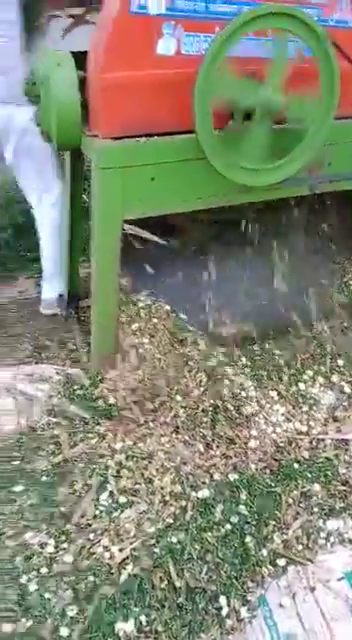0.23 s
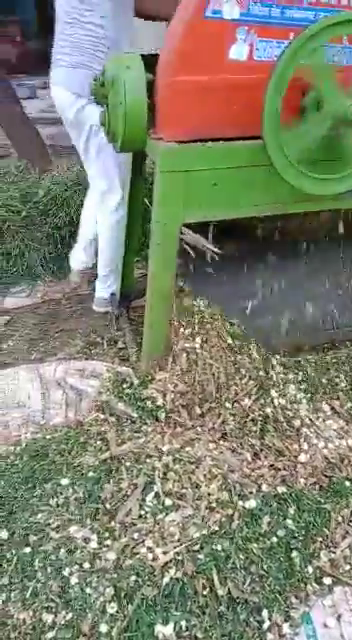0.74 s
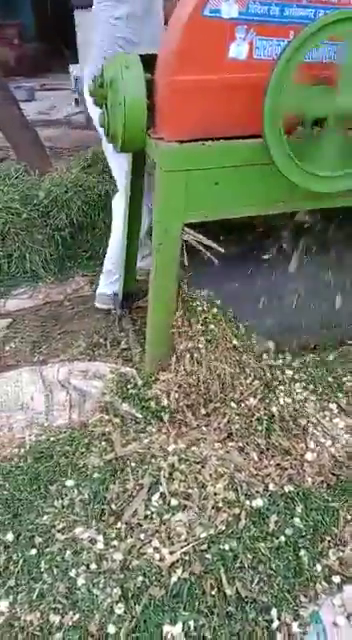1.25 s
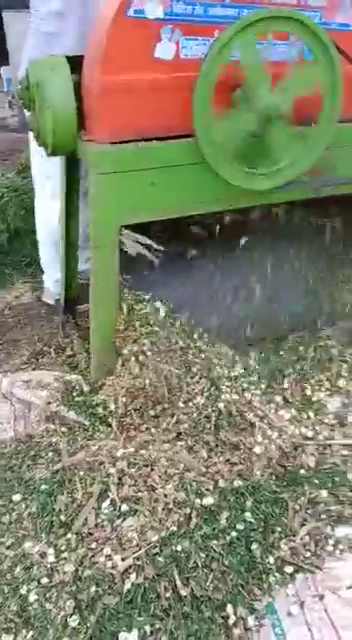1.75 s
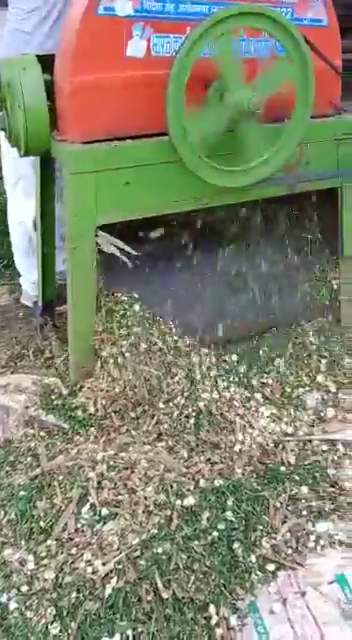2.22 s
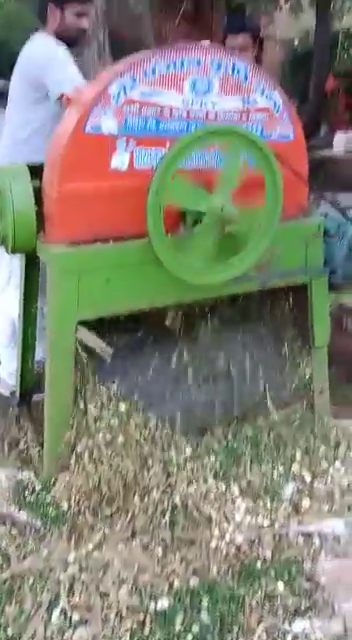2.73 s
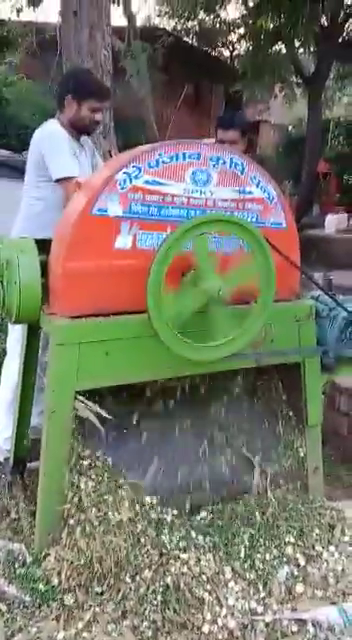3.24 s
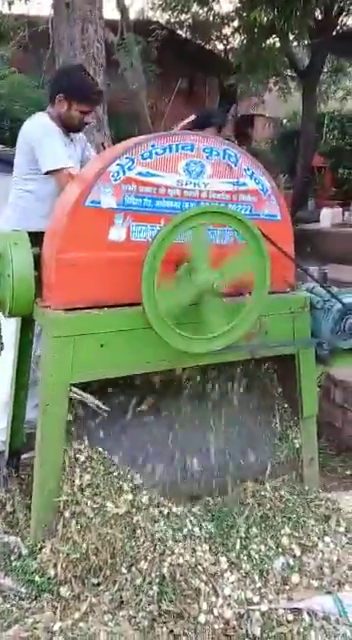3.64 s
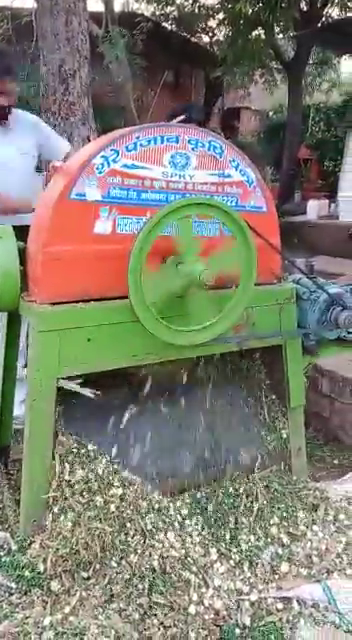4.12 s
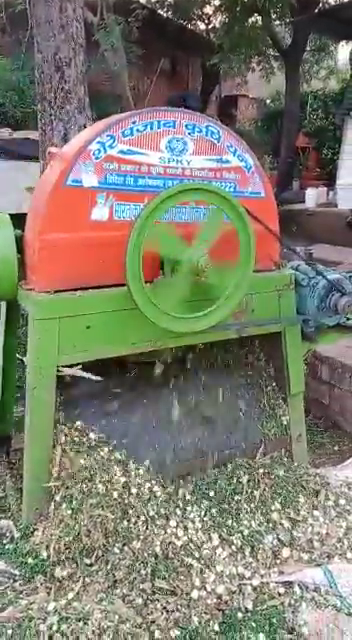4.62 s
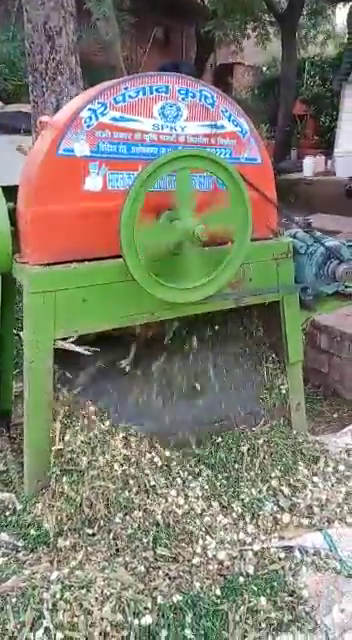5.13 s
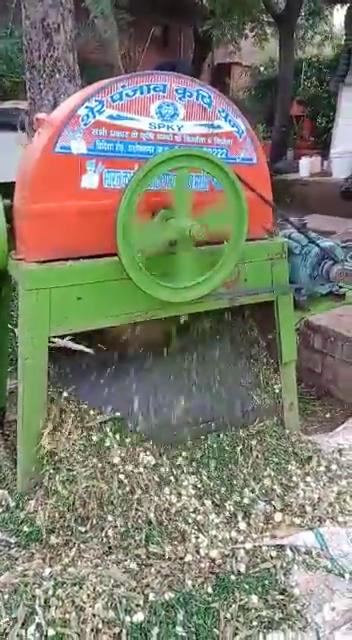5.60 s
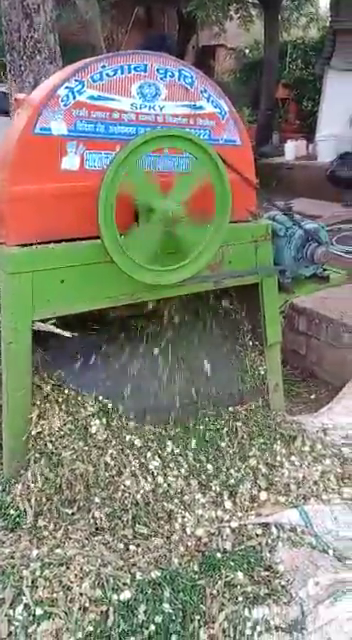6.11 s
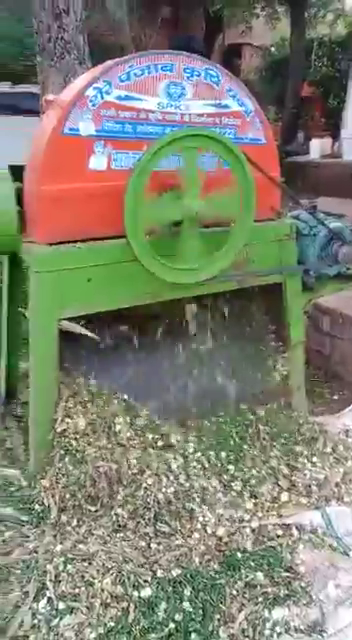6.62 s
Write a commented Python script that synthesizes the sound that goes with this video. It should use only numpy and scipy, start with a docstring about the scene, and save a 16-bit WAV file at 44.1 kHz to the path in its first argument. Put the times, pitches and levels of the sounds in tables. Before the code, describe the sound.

An electric chaff cutter runs steadily for about seven seconds, outdoors and a step from the microphone. Its knives cut green stalks evenly, about seven times a second, each cut a crisp snap with a woody crunch, followed by chopped pieces pattering on the steel hood and the heap. Underneath, a feed gear clanks in a fast rattle that makes the panels ring, and the frame gives a low drone and hum. Thicker stalks crack at about 1.2, 1.9, 3.6 to 4 and 6.5 seconds. Hard pieces ping briefly on the steel three times around 2 seconds, then near 3.8, faintly at 4.8, and at 6.4. Dull thumps jolt the frame near 0.9 and 1.3 seconds, and more lightly later. Between 2.4 and 3.1 seconds the microphone moves from the side to the front, and the treble opens slightly. The chopping continues to the end.

```python
"""Quick, even crunching of green stalks: an electric chaff cutter, outdoors, a step from the microphone.
Two knives on its flywheel each cut once a turn; the chopped pieces patter on the steel hood and fall.
Under the cuts an eleven-tooth feed gear clanks and rattles the panels, and the hood and frame drone
with the drive. Partway through, the microphone moves round to the front and the top treble opens a little."""
import sys
import numpy as np
from scipy import signal
from scipy.fft import rfft, irfft, next_fast_len
from scipy.io import wavfile
from scipy.ndimage import map_coordinates

SR = 44100
rng = np.random.default_rng(int(sys.argv[2]) if len(sys.argv) > 2 else 0)


def unload_wav(signal):
    """Save mono or channel-first audio to the path in sys.argv[1] as 16-bit WAV at rate SR, clipped to [-1, 1]."""
    wavfile.write(
        sys.argv[1],
        SR,
        np.round(np.clip(np.atleast_2d(signal).T, -1, 1) * 32767).astype(np.int16),
    )


N = 302526

# Speed of the flywheel. Each row: time in seconds, turns a second.
FLYWHEEL_SPEED = [(0, 3.706), (3.3, 3.705), (3.8, 3.718), (4.8, 3.719), (5.3, 3.707), (6.9, 3.717)]
# Load on the drive. Each row: time in seconds, dB over the usual load.
DRIVE_LOAD = [(0.0, -0.0), (0.9, -0.1), (1.55, -2.5), (2.0, -0.3), (2.45, -1.5), (2.85, 1.1), (3.2, -0.9),
              (3.7, 1.6), (4.4, 1.7), (4.95, 0.95), (5.45, -0.25), (6.85, 0.3)]
# Two knives, one biting harder. Each row: place on the wheel in turns, snap offset in dB, crunch in dB.
FLYWHEEL_KNIVES = [(0.367, -1.5, -18), (0.878, 0.5, -16.5)]
# Fodder in the chute. Each row: time in seconds, crisp snap and flying chaff in relative dB.
CHUTE_FODDER = [(0.1, -19, -23.5), (0.55, -14.5, -28), (1.1, -15.9, -23), (1.4, -18.1, -27.5),
                (1.9, -17.0, -24.7), (2.7, -17.5, -27.3), (3.15, -21, -27.2), (3.75, -18.5, -25),
                (4.7, -18.5, -25), (5.2, -18.5, -25.5), (6.4, -18, -28), (6.8, -16.5, -23.5)]
# The bundle thickens and takes longer to cut. Each row: time in seconds, length of the bite in seconds.
BITE_LENGTH = [(1.0, 0.021), (1.3, 0.028)]
# Thick woody stalks cracking. Each row: time of the peak in seconds, level in dB.
THICK_STALKS = [(0.197, -20), (0.53, -22), (1.18, -16.5), (1.857, -17), (3.609, -16), (3.786, -15),
                (4.013, -19), (5.495, -19.5), (6.471, -14.5)]
# Hard pieces hitting the steel. Each row: start in seconds, level in dB, pitch in Hz.
STEEL_KNOCKS = [(1.828, -12, 3100), (1.984, -10.5, 2860), (2.121, -10, 3086), (3.78, -13, 2850),
                (4.819, -18, 3070), (6.432, -10, 2900)]
# Thick bundles jolting the frame as they feed in. Each row: time of the peak in seconds, level in dB.
FEED_THUMPS = [(0.864, -20), (1.277, -22), (2.457, -27), (2.757, -30), (2.94, -28), (3.755, -24),
               (3.964, -26), (4.55, -25), (4.654, -28), (5.078, -25), (5.76, -27), (6.09, -25), (6.73, -24)]
# Steel panels. Each row: pitch in Hz, width in Hz, relative dB from the side, then from the front.
PANEL_MODES = [(588.5, 70, -13, -14.5), (748, 71, -5, -27), (938, 68, -16, -11), (1129, 61, -18, -9.5),
               (1198, 25, -12.5, -14), (1243, 47, -11, -16), (1313, 53, -12.5, -8.5), (1362, 39, -17, -16),
               (1720, 84, -9.5, -13)]
# Hum of the drive. Each row: multiple of the tooth rate, relative level in dB.
HUM_PARTIALS = [(4, -3), (6, -7), (7, -0.5), (8, -13.5), (10, -4.5)]
# The walk round the machine. Each row: time in seconds, place from 0 (side) to 1 (front).
MIC_PATH = [(2.4, 0.3), (3.1, 1)]
# Tone colours at close range. Each row: frequency in Hz, relative spectral density in dB.
SNAP_COLOUR = [(100, -39), (1500, -13), (3000, -3.5), (4200, -5), (5100, 3.5), (6000, -2), (7500, -9),
               (9000, -17.5), (12000, -18), (15500, -16)]  # crisp skins snapping
CRUNCH_COLOUR = [(50, -37), (150, -6), (300, -0.5), (600, -2.5), (1000, -0.5), (1600, 5), (1950, -8.5),
                 (2400, -2.5), (2900, 2.5), (3500, -2.5), (4200, -35.5), (8000, -22.5), (16000, -46)]  # woody cores breaking
CHAFF_COLOUR = [(700, -16), (1900, -5.5), (2400, -2.5), (2900, 3.5), (3500, 1), (4200, -9), (5200, -2.5),
                (6500, -12), (7600, -16.5), (9500, -40), (15500, -26)]  # chopped pieces landing
GEAR_COLOUR = [(80, -64), (500, -29.5), (820, -29), (925, -9), (1050, -33.5), (1150, 10.5), (1260, 1.5),
               (1355, -2), (1410, -35.5), (1540, -19), (1900, -23.5), (3000, -5), (4500, -14.5),
               (16000, -46)]  # the cast gear and its guard ringing
SCRAPE_COLOUR = [(80, -48), (600, -23.5), (930, -13.5), (1100, -1.5), (1450, -3.5), (1530, -1.5),
                 (1590, -10.5), (1660, 4), (1735, -4), (1800, -14), (2100, -16), (5000, -51.5),
                 (16000, -75)]  # teeth sliding out of mesh
BOOM_COLOUR = [(25, -41), (45, -30), (72, -20.5), (92, -9), (112, -12.5), (140, -0.5), (168, -0.5),
               (197, -3), (280, 3.5), (425, -6.5), (490, -8), (800, -13.5), (2200, -25), (16000, -57.5)]  # hood and frame booming
THUD_COLOUR = [(30, -37), (65, -13.5), (90, 0.5), (115, 1), (160, -1), (260, -9.5), (400, -9), (900, -42),
               (16000, -92)]  # the jolted frame

GEAR_TEETH = 11
GEAR_DB, FRAME_DB = -20.5, -19  # base gains at the usual load
GEAR_PER_LOAD, FRAME_PER_LOAD, CRUNCH_PER_LOAD = 1.33, 0.81, 1.17  # dB for each dB of load


def cut_schedule():
    """Each knife breaks through once a turn. Gives seconds, then snap, crunch and chaff in dB."""
    turns = np.cumsum(curves(FLYWHEEL_SPEED)[0]) / SR
    passes = [(turn + place, snap, crunch)
              for turn in range(int(turns[-1]) + 1) for place, snap, crunch in FLYWHEEL_KNIVES]
    angle, knife_snap, knife_crunch = np.transpose([p for p in passes if p[0] < turns[-1]])
    times = np.interp(angle, turns, np.arange(N) / SR)
    snap_db, chaff_db = at(CHUTE_FODDER, times)
    crunch_db = knife_crunch + CRUNCH_PER_LOAD * at(DRIVE_LOAD, times)[0]
    cuts = np.column_stack([times, snap_db + knife_snap, crunch_db, chaff_db])
    scatter = [0.0022, 0.34, 1.63, 1.74]  # no two cuts are alike: seconds, dB, dB, dB
    return (cuts + scatter * rng.standard_normal(cuts.shape)).T


def knives(cuts):
    """Each cut is a burst of breaking fibres: crisp skins, woody cores, now and then a thick stalk."""
    peaks, snap_db, crunch_db, _ = cuts
    bite_s, = at(BITE_LENGTH, peaks)
    snap = strokes(peaks, snap_db - 0.5, bite_s, fall_s=0.014, linger_s=0.04, linger_db=6)
    skins = snap * crackle(rate=12000, spread_db=1.5, clump_db=1.45)
    usual = strokes(peaks, crunch_db - 1.5, bite_s, fall_s=0.031, linger_s=0.048, linger_db=2)
    thick = strokes(*np.transpose(THICK_STALKS), rise_s=0.016, fall_s=0.024, linger_s=0.04, linger_db=1.5)
    cores = np.hypot(usual, thick) * crackle(rate=5000, spread_db=3.0, clump_db=1.5)
    return ring(skins, SNAP_COLOUR) + ring(cores, CRUNCH_COLOUR)


def chaff(cuts):
    """Chopped pieces patter on the hood and the heap, louder after a cut that throws more."""
    peaks, _, _, chaff_db = cuts
    flight_s = 0.028
    level_db = np.interp(np.arange(N) / SR, peaks + flight_s, chaff_db)
    flutter_db = 1.3 * wobble(45)
    patter = crackle(rate=3700, spread_db=1.5, clump_db=1.5)
    return amp(level_db - 3.0 + flutter_db) * ring(patter, CHAFF_COLOUR)


def knocks():
    """Hard pieces of stalk strike the steel: a short, rough ring each."""
    out, t = np.zeros(N + SR), np.arange(SR // 10) / SR
    attack = 1 - np.exp(-t / 0.00049)
    decay_db = -60 * t / 0.065
    for start, db, hz in STEEL_KNOCKS:
        phase = 2 * np.pi * hz * t + .7 * wobble(500)[:len(t)]
        out[round(start * SR):][:len(t)] += amp(db + decay_db) * attack * np.sin(phase)
    return out[:N]


def gear():
    """Every tooth lands with a clank, chatters as it takes the load, then scrapes out of mesh."""
    teeth = tooth_count()
    tooth, phase = teeth.astype(int), teeth % 1
    scatter_db = .7 * rng.standard_normal(tooth[-1] + 1)[tooth]
    force = amp(GEAR_DB + GEAR_PER_LOAD * curves(DRIVE_LOAD)[0] + scatter_db)
    landings = np.diff(np.floor(teeth + .01 * wobble(20)), prepend=0) > 0
    t = np.arange(SR // 20) / SR
    casting_ring = np.exp(-((t - .007) / 0.0038) ** 2) * np.sin(2 * np.pi * 1288 * t)
    clank = amp(-5.3) * unit(signal.fftconvolve(landings * 1., casting_ring)[:N])
    contact = np.exp(-((phase - .22) / 0.24) ** 2)
    chatter = unit(contact * rng.standard_normal(N))
    sliding = amp(2.1 * np.cos(2 * np.pi * (phase - .42)))
    scrape = amp(-6.5) * ring(unit(sliding * rng.standard_normal(N)), SCRAPE_COLOUR)
    return force * (clank + amp(-10) * ring(chatter, GEAR_COLOUR) + scrape + amp(-3) * panels(chatter))


def tooth_count():
    """How many gear teeth have met by each sample, starting halfway through a tooth."""
    return .5 + GEAR_TEETH * np.cumsum(curves(FLYWHEEL_SPEED)[0]) / SR


def panels(shaking):
    """Steel panels sing on between the teeth; their balance depends on where the microphone stands."""
    front, = curves(MIC_PATH)
    out = np.zeros(N)
    for hz, width, side_db, front_db in PANEL_MODES:
        resonance = signal.iirpeak(hz, hz / width, SR)
        mode = signal.lfilter(*resonance, signal.lfilter(*resonance, shaking))
        out += amp(side_db + front * (front_db - side_db)) * unit(mode)
    return out


def frame(cuts):
    """Hood and frame boom and hum with the drive; each cut jolts them lightly, thick bundles harder."""
    teeth = tooth_count()
    boom = amp(0.81 * wobble(10)) * ring(ticks(rate=2500, spread_db=2.5), BOOM_COLOUR)
    hum = np.zeros(N)
    for multiple, db in HUM_PARTIALS:
        level = amp(db + 4.5 * wobble(7))
        hum += level * np.sin(2 * np.pi * multiple * teeth + 1.06 * wobble(9))
    drive = amp(FRAME_DB + FRAME_PER_LOAD * curves(DRIVE_LOAD)[0])
    drone = drive * (amp(-1.89) * boom + amp(-11.5) * unit(hum))
    cut_jolts = [(peak, -35 + 4.5 * rng.standard_normal()) for peak in cuts[0]]
    peaks, jolt_db = np.transpose(list(FEED_THUMPS) + cut_jolts)
    jolts = strokes(peaks, jolt_db, rise_s=0.024, fall_s=0.037, linger_s=.05, linger_db=-14)
    return drone + ring(jolts * ticks(rate=3300, spread_db=0), THUD_COLOUR)


def hood_shade(x, corner_hz=8600, side_db=-2.5, front_db=0.5):
    """From the side the hood shades the top treble; it opens as the microphone comes to the front."""
    front, = curves(MIC_PATH)
    treble = signal.sosfiltfilt(signal.butter(2, corner_hz, 'highpass', fs=SR, output='sos'), x)
    return x + (amp(side_db + front * (front_db - side_db)) - 1) * treble


def strokes(peaks, level_db, rise_s, fall_s, linger_s, linger_db):
    """Envelope of blows that set in sharply, build to their peak, drop quickly and linger a little."""
    touch_share, touch_s = .25, .003  # the part of a blow that arrives almost at once
    power, t = np.zeros(N), np.arange(N) / SR
    for peak, db, build in np.broadcast(peaks, level_db, rise_s):
        start = peak - build
        near = slice(int((start - .02) * SR), int((start + .3) * SR))
        touch = np.clip((t[near] - start) / touch_s + 1, 0, 1)
        press = np.clip((t[near] - start) / (0.87 * build), 0, 1)
        attack = touch_share * touch + (1 - touch_share) * press
        after = np.maximum(t[near] - peak, 0)
        decay = np.exp(-(after / fall_s) ** 2) + amp(linger_db) * np.exp(-after / linger_s)
        power[near] += (amp(db) * attack * decay / (1 + amp(linger_db))) ** 2
    return np.sqrt(power)


def crackle(rate, spread_db, clump_db):
    """Tiny impacts that swell in clumps: fibre by fibre, and more slowly stalk by stalk."""
    return unit(ticks(rate, spread_db) * amp(clump_db * (0.76 * wobble(300) + 0.93 * wobble(70))))


def ticks(rate, spread_db):
    """Random tiny impacts, rate a second, with scattered sizes, at rms 1."""
    hits = rng.random(N) < rate / SR
    sizes = amp(spread_db * np.clip(rng.standard_normal(N), -2, 2))
    return unit(hits * rng.choice([-1, 1], N) * sizes)


def ring(x, colour):
    """x through a resonant body of the given colour and unit power gain."""
    size = 8192
    hz, db = np.transpose(colour)
    gain = amp(np.interp(np.log(np.fft.rfftfreq(size, 1 / SR) + 1), np.log(hz), db))
    # minimum phase: the body rings only after it is struck
    cepstrum = irfft(np.log(gain))
    cepstrum[1:size // 2] *= 2
    cepstrum[size // 2 + 1:] = 0
    response = irfft(np.exp(rfft(cepstrum)))
    return signal.fftconvolve(x, response / np.linalg.norm(response))[:N]


def wobble(rate):
    """A smooth random curve, rate knots a second."""
    return map_coordinates(rng.standard_normal(int(N * rate / SR) + 4), [np.arange(N) * rate / SR])


def at(rows, times):
    """Each column after the time, read at the given times."""
    seconds, *columns = np.transpose(rows)
    return [np.interp(times, seconds, column) for column in columns]


def curves(rows):
    """Each column after the time, read at every sample."""
    return at(rows, np.arange(N) / SR)


def amp(db):
    """Decibels to gain."""
    return 10 ** (np.asarray(db) / 20)


def unit(x):
    """x at rms 1."""
    return x / np.sqrt(np.mean(x ** 2) + 1e-20)


def scene():
    """The whole machine in the open air, on one microphone a step away."""
    cuts = cut_schedule()
    cutting = hood_shade(knives(cuts) + chaff(cuts))
    return (cutting + knocks() + gear() + frame(cuts))[None]


def record(dry):
    """The microphone rounds off the highest peaks and keeps nothing above its band limit."""
    ceiling, top_hz = .9, 15830
    rounded = dry / (1 + np.abs(dry / ceiling) ** 6) ** (1 / 6)
    size = next_fast_len(N + SR // 2)
    in_band = np.fft.rfftfreq(size, 1 / SR) < top_hz
    return irfft(rfft(rounded, size) * in_band, size)[..., :N]


dry = scene()
out = record(dry)
unload_wav(out)
```